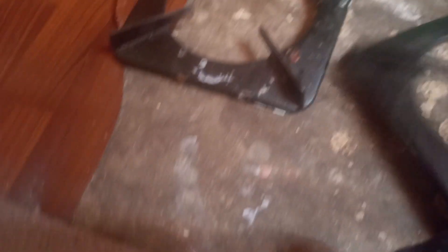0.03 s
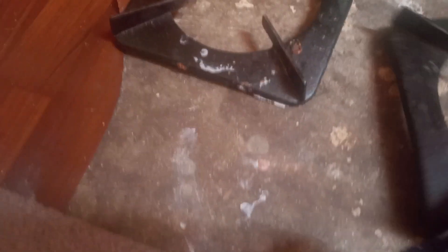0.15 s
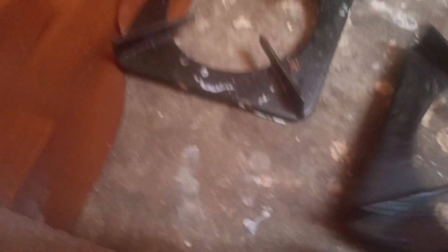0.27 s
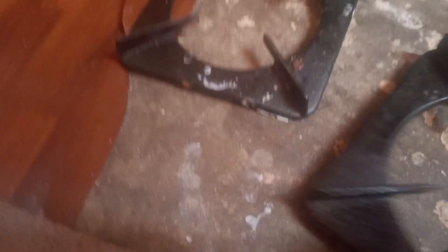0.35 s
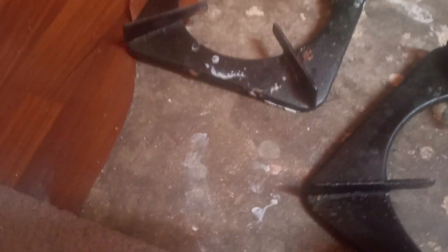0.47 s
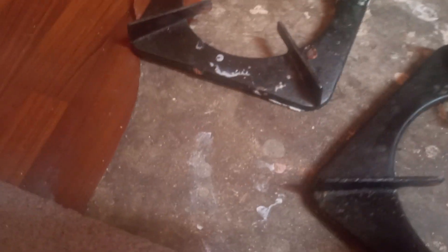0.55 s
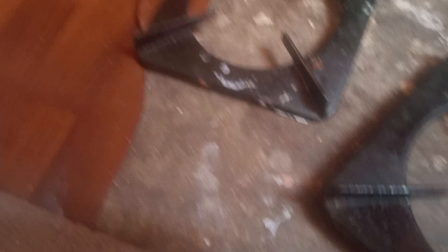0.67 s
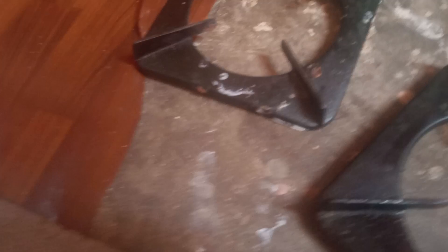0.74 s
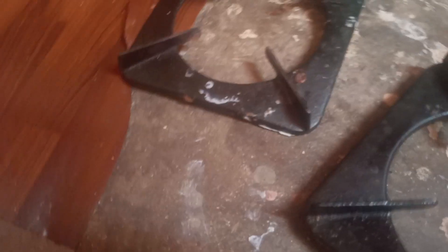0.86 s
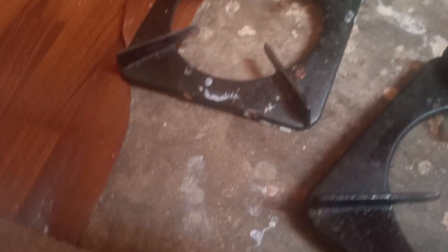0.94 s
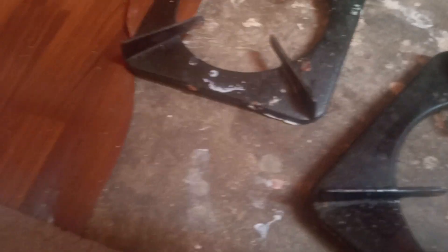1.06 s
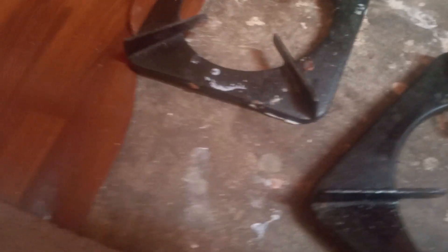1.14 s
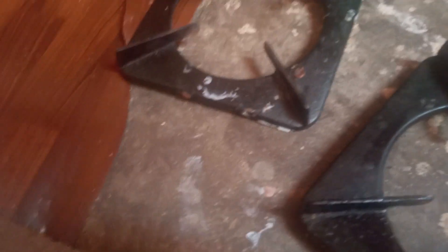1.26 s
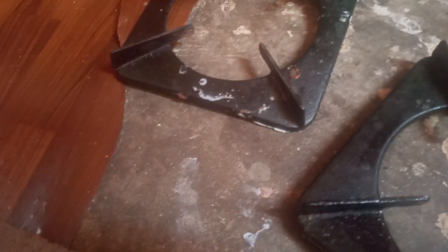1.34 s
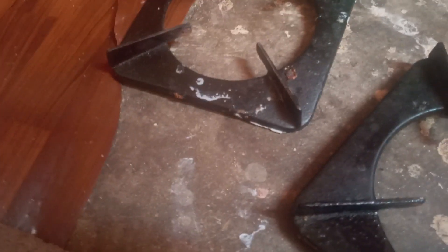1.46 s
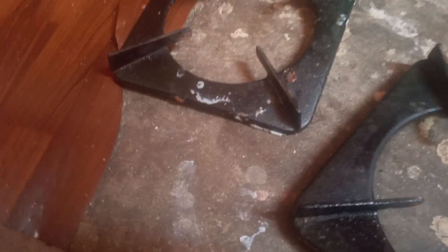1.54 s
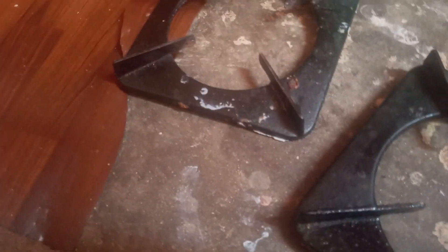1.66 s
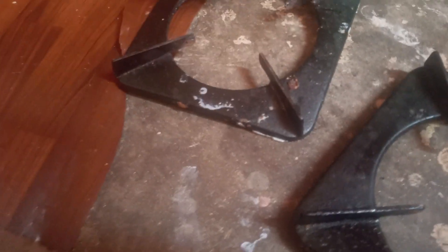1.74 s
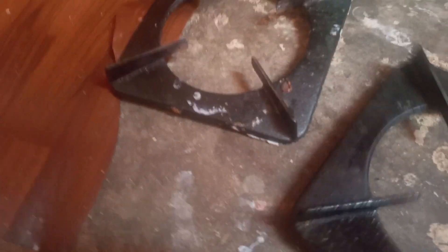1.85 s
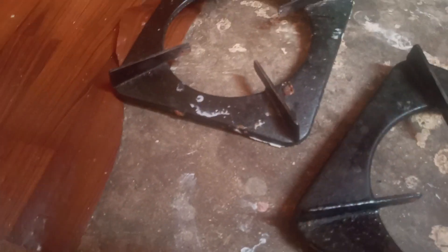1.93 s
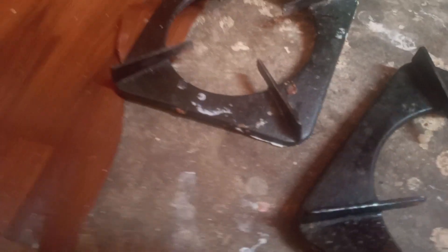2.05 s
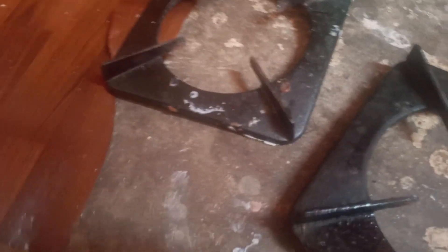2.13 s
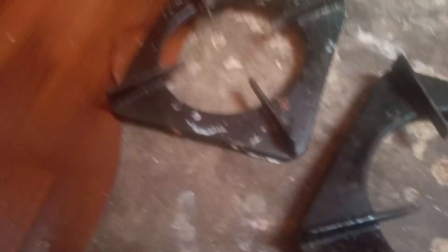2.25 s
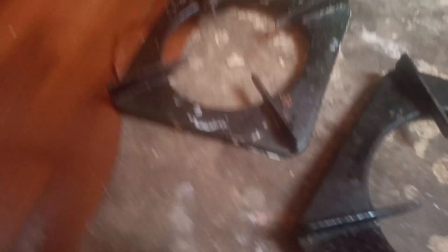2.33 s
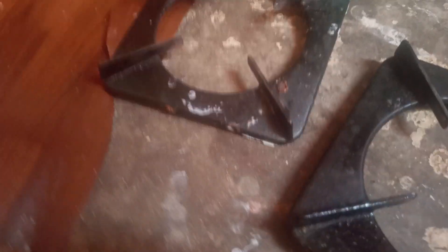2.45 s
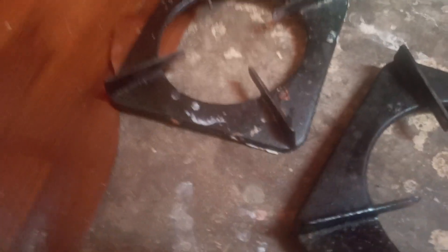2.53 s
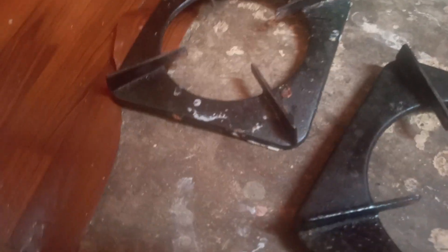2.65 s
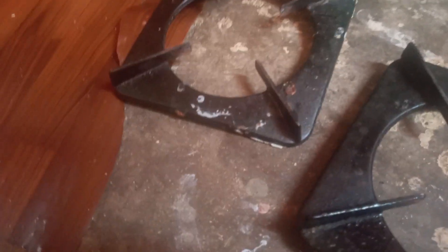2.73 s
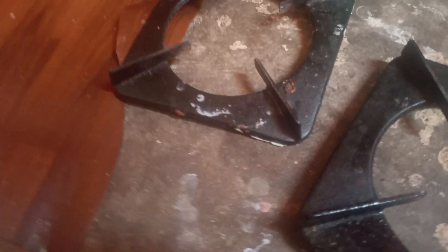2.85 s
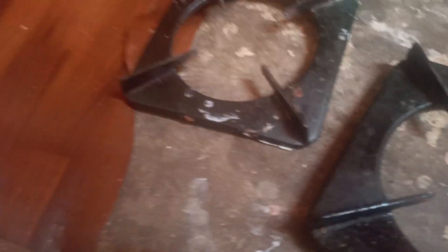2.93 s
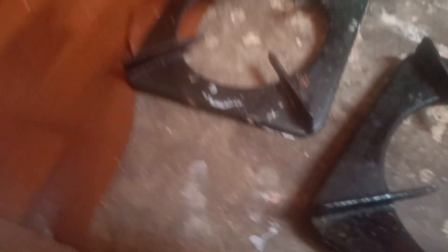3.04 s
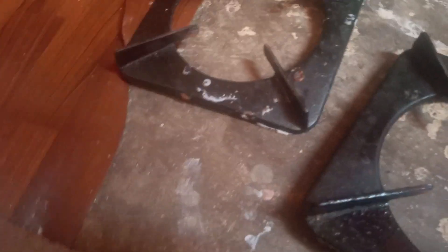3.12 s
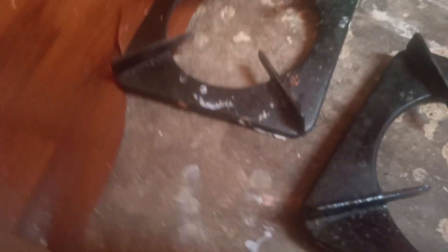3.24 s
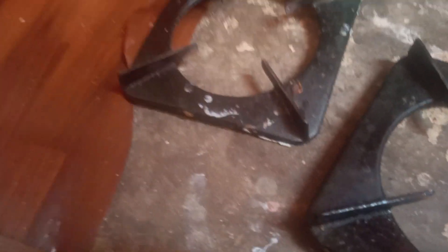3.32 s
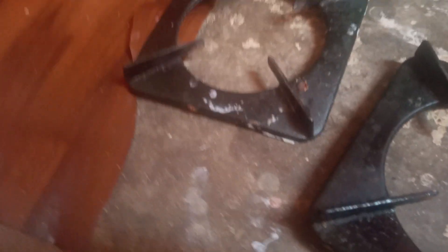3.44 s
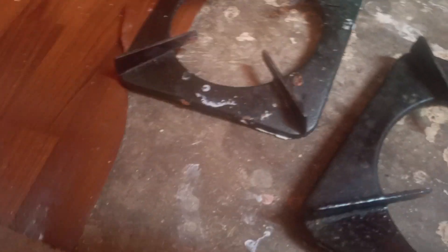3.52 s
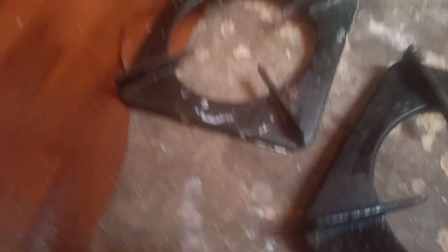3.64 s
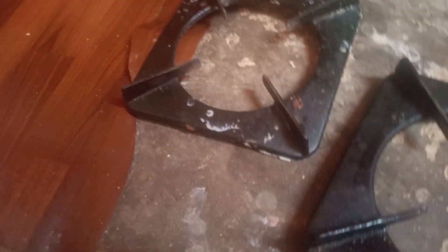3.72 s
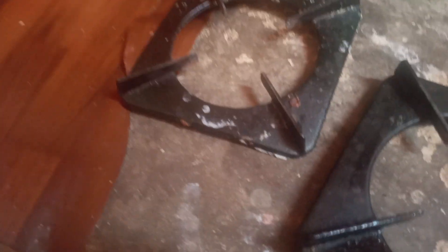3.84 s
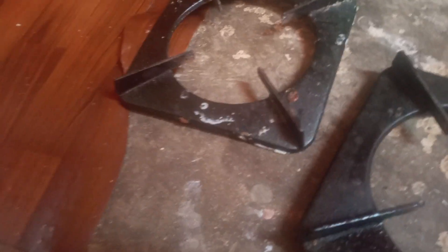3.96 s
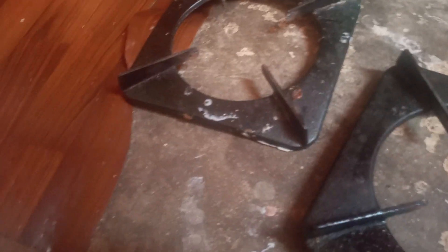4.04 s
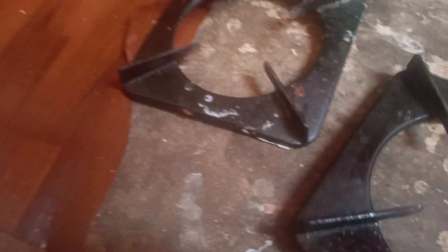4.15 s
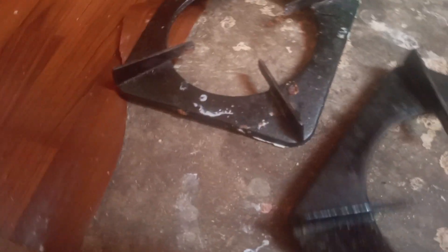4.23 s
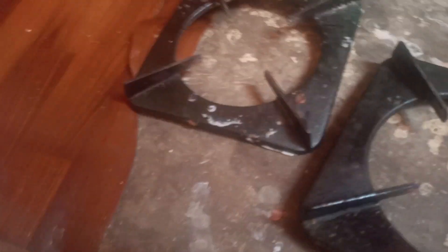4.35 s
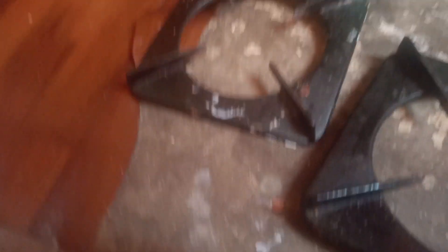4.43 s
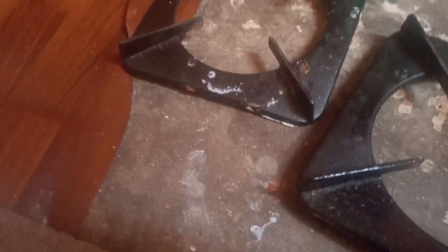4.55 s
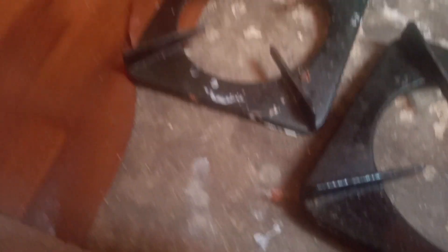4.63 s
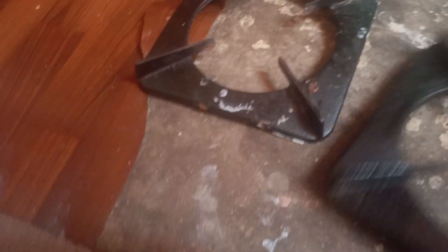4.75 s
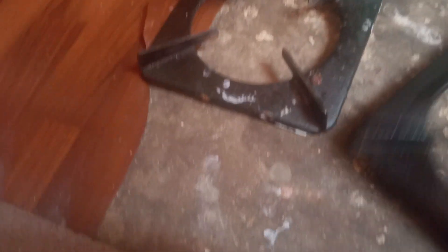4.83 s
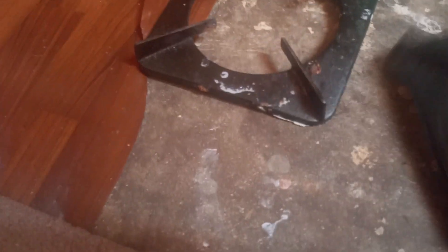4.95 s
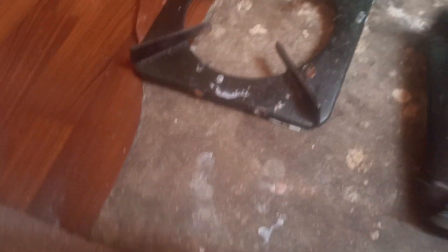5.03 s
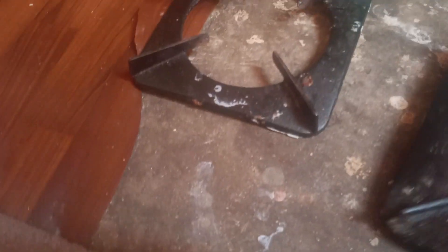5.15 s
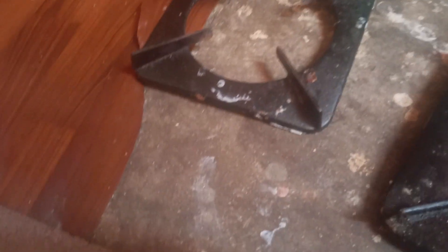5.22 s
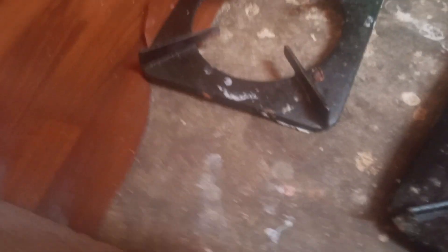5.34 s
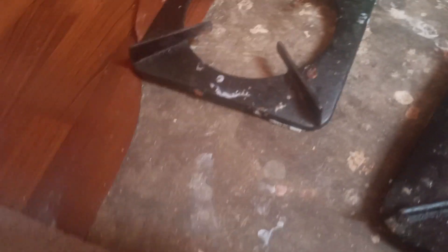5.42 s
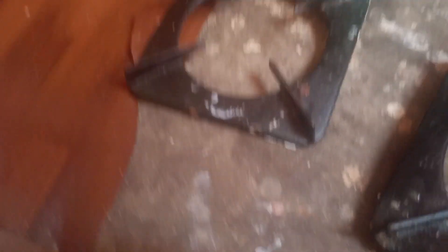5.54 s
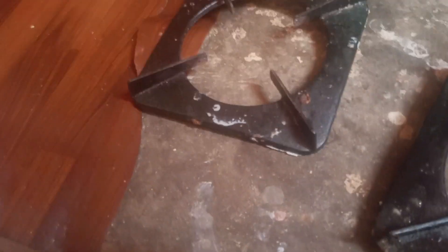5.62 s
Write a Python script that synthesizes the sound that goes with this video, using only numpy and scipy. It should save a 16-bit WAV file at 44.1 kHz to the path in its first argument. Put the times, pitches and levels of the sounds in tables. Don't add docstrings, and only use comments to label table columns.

```python
import sys
import numpy as np
from scipy import signal
from scipy.fft import rfft, irfft
from scipy.io import wavfile

SR = 44100
rng = np.random.default_rng(int(sys.argv[2]) if len(sys.argv) > 2 else 0)


def file_out(sig):
    cols = np.atleast_2d(sig).T
    lim = np.clip(cols, -1, 1)
    pcm = np.round(lim * 32767).astype(np.int16)
    wavfile.write(sys.argv[1], SR, pcm)


def natural_amplitude(level_db):
    exponent = np.asarray(level_db, float) / 20
    return 10 ** exponent


N = 250488
STRONGEST_MODE_HZ = 2444


def rms_one(x):
    return x / np.sqrt(np.mean(x ** 2) + 1e-20)


def in_time(rows, quiet=-120):
    s, *columns = np.transpose(rows)
    t = np.arange(N) / SR
    return [np.interp(t, s, column, quiet, quiet) for column in columns]


def convolve(x, response):
    return signal.fftconvolve(x, response)[:N]


def colour(x, points, size=4096):
    hz, db = np.transpose(points)
    bins_hz = np.arange(size // 2 + 1) * SR / size
    log_gain = np.log(natural_amplitude(np.interp(np.log(bins_hz + 1), np.log(hz), db)))
    cepstrum = irfft(log_gain)
    cepstrum[1:size // 2] *= 2
    cepstrum[size // 2 + 1:] = 0
    return convolve(x, irfft(np.exp(rfft(cepstrum))))


def drift(rate_hz):
    r = np.exp(-2 * np.pi * rate_hz / SR)
    slow = signal.lfilter([1], [1, -2 * r, r * r], rng.standard_normal(N + SR))
    return rms_one(slow[SR:])


def modes(x, table, wander_db, rate_hz):
    out = np.zeros(N)
    for k, (hz, width_hz, db) in enumerate(sorted(table)):
        r = np.exp(-np.pi * width_hz / SR)
        spread_db = wander_db * (hz / 2400) ** 0.32 * min(1, 200 / width_hz)
        fed = x * natural_amplitude(db + spread_db * drift(rate_hz)) + 1e-18
        zeros = [(1 - r * r) / 2, 0, (r * r - 1) / 2]
        poles = [1, -2 * r * np.cos(2 * np.pi * hz / SR), r * r]
        out += (-1) ** k * signal.lfilter(zeros, poles, fed)
    return out


def grains(per_s, spread_db):
    sizes = natural_amplitude(spread_db * np.minimum(rng.exponential(1, N), 4)) * rng.choice([-1, 1], N)
    return rms_one(sizes * (rng.random(N) < per_s / SR))


def split(x, low_hz, high_hz):
    low = signal.sosfilt(signal.butter(2, low_hz, fs=SR, output="sos"), x)
    high = signal.sosfilt(signal.butter(2, high_hz, "high", fs=SR, output="sos"), x)
    return low, x - low - high, high


def bursts(table, rise_s, lead_s, rough, swell=0):
    out, t = np.zeros(N + 6000), np.arange(6000) / SR
    phases = rng.uniform(0, 2 * np.pi, len(table))
    for (s, length, db, hz), phase in zip(table, phases):
        growth = 1 - np.exp(-(t / (rise_s + swell * length)) ** 2)
        hold_s = length * (1 + swell / 2) + lead_s + 0.00076
        shape = growth * np.exp(-0.94 * (t / hold_s) ** 3)
        at = max(round((s - lead_s - swell * length / 2) * SR), 0)
        out[at:at + len(t)] += natural_amplitude(db) * shape * np.sin(2 * np.pi * hz * t + phase)
    return out[:N] * (1 + rough * drift(230))


def background():
    # frequency_hz, level_db per Hz
    spectrum = [(25, -38.5), (45, -16), (70, 2.5), (140, -4), (260, -8), (430, -17.5), (600, -14),
                (1100, -17.5), (2400, -23), (4500, -28), (6000, -25), (8200, -32.5), (10800, -27),
                (13500, -32), (15700, -34)]
    # frequency_hz, width_hz, level_db
    hum = [(77.8, 5.3, -1), (134, 6.4, 4), (308, 2.4, -5), (636.4, 7.5, -9)]
    # time_s, level_db
    murmur = [
        (0, -0.5),
        (1.2, 1.5),
        (3.2, -2),
        (4.7, -3),
        (5.3, 2.5),
        (5.7, -1.5),
    ]
    noise = natural_amplitude(-51) * rms_one(colour(rng.standard_normal(N), spectrum))
    noise += natural_amplitude(-27.5) * modes(rng.standard_normal(N), hum, wander_db=-5.5, rate_hz=3.3)
    low, middle, high = split(noise, 330, 4000)
    middle = middle * natural_amplitude(in_time(murmur)[0] + 1.0 * drift(4.2))
    return low * natural_amplitude(-3.5) + middle + high * natural_amplitude(0.79 * drift(4))


def room(x):
    t60_s = 0.2
    t = np.arange(SR // 2) / SR
    tail = rng.standard_normal(len(t)) * natural_amplitude(-60 * t / t60_s) * (t > .006)
    tail = signal.lfilter([1], [1, -.45], tail)
    return convolve(x, tail / np.sqrt(np.sum(tail ** 2)))


def handling():
    # middle_s, length_s, level_db
    moves = [
        (.12, 0.3, -50),
        (1.07, 0.11, -52),
        (1.505, 0.14, -55),
        (4.409, 0.38, -50),
        (4.75, 0.29, -48),
        (5.103, 0.59, -46),
    ]
    t = np.arange(N) / SR
    swell = sum(natural_amplitude(db) * np.cos(np.pi * np.clip((t - s) / length, -.5, .5)) for s, length, db in moves)
    band = signal.butter(3, [65.7, 310], "band", fs=SR, output="sos")
    return swell * natural_amplitude(4.8 * drift(21)) * rms_one(signal.sosfilt(band, rng.standard_normal(N)))


def suds():
    # time_s, pitch_hz, level_db
    whistle = [
        (5.37, 5750, -85),
        (5.42, 5600, -64),
        (5.46, 5300, -59),
        (5.52, 5140, -79),
    ]
    # start_s, peak_db, pitch_hz
    pops = [(.768, -47, 12000), (.826, -50, 8500), (.961, -38, 6000), (4.541, -53, 10000),
            (4.571, -52, 9800), (4.615, -54, 8000), (1.012, -45, 11000)]
    hz, db = in_time(whistle)
    out = np.sin(2 * np.pi * np.cumsum(np.maximum(hz, 0)) / SR) * natural_amplitude(db) * drift(250)
    t = np.arange(400) / SR
    for (s, db, hz), puff in zip(pops, rng.standard_normal((len(pops), 400))):
        band = signal.butter(2, [hz * .82, hz * 1.4], "band", fs=SR, output="sos")
        at = round(s * SR)
        out[at:at + 400] += natural_amplitude(db) * signal.sosfilt(band, puff * np.exp(-t / 0.002))
    return out


def groan():
    # time_s, pitch_hz, level_db
    slide = [
        (0, 299.4, -36),
        (.08, 308, -61),
        (.13, 308, -42),
        (.24, 308, -41),
        (.32, 303, -56),
        (.36, 305, -74),
    ]
    hz, db = in_time(slide)
    return np.sin(2 * np.pi * np.cumsum(np.maximum(hz, 0)) / SR) * natural_amplitude(db + 2.0 * drift(14))


def squeak():
    # start_s, length_s, peak_db, pitch_hz
    tones = [(1.322, .035, -41.5, 863), (1.352, 0.026, -42.5, 904), (1.378, 0.074, -43.5, 825),
             (1.362, 0.062, -45.5, 1228), (1.42, 0.08, -39, 1793), (1.445, 0.057, -43, 1218),
             (1.45, 0.027, -41, 1420), (1.48, 0.072, -39, 1823), (1.495, 0.057, -42.5, 808),
             (1.495, 0.054, -43, 1515), (1.5, 0.039, -44, 1375), (1.475, 0.036, -37, 1936),
             (1.545, .04, -44, 1860), (1.56, 0.037, -42, 1437), (1.57, 0.071, -44, 1208),
             (1.648, 0.031, -37.5, 815), (3.775, 0.048, -45.5, 806)]
    return bursts(tones, rise_s=0.0062, lead_s=0.00399, rough=0.64)


def pad_motion():
    # start_s, length_s, hiss_db, weight_db on the bars, lean (under 1 fastest early)
    strokes = [(0.858, 0.09, -56, 0, 1.04), (0.922, 0.23, -46.5, 0, 0.53), (1.139, 0.2, -35, 0, 0.82),
               (1.34, 0.19, -34.5, 3.5, 0.81), (1.525, 0.14, -29.5, 1.5, 1.03), (1.661, 0.16, -27, 0, 1.39),
               (1.817, 0.17, -25, -0.5, 1.32), (2.001, 0.16, -32, 0, 0.86),
               (2.146, 0.16, -24.5, -2.5, 0.98), (2.313, 0.23, -28.5, -2.5, 0.96),
               (2.503, 0.13, -45.5, 6, 1.2), (2.576, 0.13, -27.5, -2.5, 0.86),
               (2.701, 0.18, -28, -1.5, 1.01), (2.881, 0.2, -31.5, -1.5, 0.96),
               (3.066, 0.18, -30, -1.5, 0.91), (3.231, 0.19, -27, -3.5, 0.85),
               (3.388, 0.18, -26, -1.5, 1.23), (3.574, 0.19, -24, -4.5, 0.83), (3.751, 0.25, -31, 0, 0.63),
               (3.921, 0.16, -28.5, 1.5, 1.6), (4.08, 0.13, -26, -1, 1.16), (4.238, 0.19, -40, 4.5, 0.68)]
    start_s, end_s, turn_db, turn_weight_db = 1.154, 4.39, -53, 5
    t = np.arange(N) / SR
    hiss = natural_amplitude(turn_db) * np.interp(t, [start_s - .05, start_s, end_s, end_s + 0.16], [0, 1, 1, 0])
    weight_db = np.full(N, float(turn_weight_db))
    for s, length, db, bars_db, lean in strokes:
        speed = np.abs(np.sin(np.pi * np.clip((t - s) / length, 0, 1) ** lean))
        hiss += natural_amplitude(db) * speed ** 1.98
        weight_db += (bars_db - turn_weight_db) * np.sqrt(speed)
    return hiss, weight_db


def scouring():
    # frequency_hz, width_hz, level_db
    bars = [(1776, 20, -8.5), (2296, 69, 2.5), (3090.5, 73, 1), (3069, 16.6, 3.5), (3446, 130, -8.5),
            (3895, 50, -0.5), (4690, 130, -1.5), (5420, 89, -27.5), (5710, 46, 4.5), (5800, 45, 1),
            (6300, 120, -9.5), (6770, 53, 0), (6900, 50, -4.5), (7660, 29, -4.5), (8570, 81, -8.5),
            (9090, 61, -5.5), (9650, 144, -8), (9900, 55, -3.5), (10790, 950, -6.5)]
    # frequency_hz, level_db per Hz
    pad = [(350, -64.5), (600, -50.5), (845, -16), (1010, -22), (1790, -6), (2060, -13), (2290, 3),
           (2670, -2), (3970, -10), (4360, -19.5), (5820, -0.5), (7240, -7.5), (10900, -15.5), (13600, -10),
           (15800, -16)]
    hiss, weight_db = pad_motion()
    stroke = hiss * natural_amplitude(1.0 * drift(10.7))
    pushes = []
    for per_s in (9000, 12000):
        low, middle, high = split(grains(per_s, 4.9) * stroke, 600, 4000)
        pushes.append((low + middle) * natural_amplitude(np.clip(weight_db, -20, 20)) + high)
    ringing = natural_amplitude(10.0) * modes(pushes[0], bars, wander_db=2.5, rate_hz=11.3)
    return ringing + natural_amplitude(5.5) * colour(pushes[1], pad)


def chatter():
    # start_s, length_s, peak_db, pitch_hz
    first = [(0.0, 0.0064, -10.5, 2406), (0.01, 0.017, -17, 2390), (0.0349, 0.033, -16.5, 2432),
             (0.0684, 0.0044, -24, 2360), (0.0771, 0.0084, -31, 2410), (0.0887, 0.019, -20, 2250),
             (0.1105, 0.022, -25, 2390), (0.1299, 0.021, -26.5, 2350), (0.1615, 0.015, -19.5, 2440),
             (0.1746, 0.0065, -27, 2300), (0.1961, 0.034, -10.5, 2432), (0.2246, 0.025, -14.5, 2440),
             (0.2809, 0.0085, -22.5, 2480), (0.2902, 0.015, -15.5, 2410), (0.3112, 0.0057, -12, 2440),
             (0.3175, 0.0068, -10.5, 2440), (0.3341, 0.0073, -12.5, 2410), (0.3473, 0.013, -14.5, 2410),
             (0.3647, 0.0089, -12, 2400), (0.381, 0.0065, -9, 2460), (0.3873, 0.005, -14, 2420),
             (0.4015, 0.012, -10, 2366), (0.422, 0.011, -8.5, 2390), (0.4399, 0.0077, -8.5, 2432),
             (0.4518, 0.017, -17.5, 2403)]
    # start_s, length_s, peak_db, pitch_hz
    later = [(4.327, 0.0088, -17.5, 2330), (4.338, 0.0073, -23, 2370), (4.349, 0.0051, -7, 2394),
             (4.358, 0.0082, -14, 2363), (4.3674, 0.011, -8.5, 2428), (4.384, 0.0074, -12, 2426),
             (4.3904, 0.0108, -14, 2398), (4.405, 0.0082, -18, 2424), (4.7032, 0.0034, -18.5, 2440),
             (4.731, 0.0058, -21, 2470), (4.7386, 0.0046, -18, 2440), (4.801, 0.006, -11.5, 2400),
             (4.814, 0.012, -31, 2360), (4.823, 0.0043, -20, 2400), (4.834, 0.0064, -24, 2400),
             (4.853, 0.0065, -30, 2400), (4.87, 0.014, -18.5, 2400), (4.902, 0.0089, -13, 2400),
             (4.914, 0.0069, -15.0, 2334), (4.924, 0.005, -11, 2346), (4.9288, 0.01, -11, 2340),
             (4.949, 0.0078, -9.5, 2333), (4.9633, 0.022, -12.5, 2397), (4.978, 0.0072, -14, 2290),
             (4.991, 0.0045, -14, 2400), (5, 0.0107, -7.5, 2380), (5.0117, 0.00514, -5.5, 2350),
             (5.022, 0.0112, -9.5, 2340), (5.047, 0.0218, -7.5, 2380), (5.0738, 0.012, -10.1, 2354),
             (5.1004, 0.0087, -24, 2390), (5.108, 0.00875, -17, 2376), (5.1179, 0.0065, -21.5, 2295),
             (5.1244, 0.013, -22, 2300), (5.144, 0.011, -10, 2380), (5.157, 0.0147, -11, 2390),
             (5.1733, 0.0113, -14.5, 2400), (5.1865, 0.013, -11, 2380), (5.204, 0.011, -12.5, 2390),
             (5.214, 0.0108, -21, 2400), (5.2334, 0.0068, -16, 2440), (5.2396, 0.0091, -16, 2377),
             (5.259, 0.02, -23.5, 2404)]
    # start_s, length_s, peak_db, pitch_hz
    struck = [(0.7338, 0.0041, -23, 2310), (0.738, 0.013, -29, 2385), (0.746, 0.01, -26.5, 2420),
              (0.981, 0.0053, -11, 2420), (0.9958, 0.003, -16, 2330), (1.0021, 0.0045, -18.5, 2440),
              (1.015, 0.014, -29, 2390), (1.0667, 0.01, -23.5, 2436), (1.327, 0.0057, -26, 2436),
              (1.337, 0.0052, -33, 2440), (1.6074, 0.0086, -25, 2294), (1.648, 0.011, -26, 2340),
              (1.6636, 0.0051, -28.5, 2440), (1.926, 0.0049, -30.5, 2370), (1.9374, 0.0047, -10.5, 2438),
              (1.9473, 0.0077, -12.5, 2400), (1.956, 0.02, -36, 2440), (1.9745, 0.0053, -26, 2490),
              (1.9832, 0.008, -35, 2470), (2.141, 0.0099, -28, 2454), (2.2132, 0.0077, -33, 2340),
              (2.22, 0.0068, -25.5, 2330), (2.2358, 0.0078, -30, 2440), (2.241, 0.0042, -29, 2400),
              (2.249, 0.0045, -23, 2400), (2.259, 0.0084, -9.5, 2428), (2.277, 0.0043, -25, 2450),
              (2.8605, 0.0034, -34, 2380), (2.869, 0.0071, -35, 2470), (3.723, 0.018, -23, 2400),
              (3.7515, 0.014, -10, 2428), (3.78, 0.019, -30, 2450), (4.182, 0.0049, -26, 2430),
              (4.1955, 0.0075, -8.5, 2340), (4.2019, 0.0044, -9, 2384), (4.211, 0.0061, -11, 2440),
              (4.233, 0.0098, -25, 2450), (4.25, 0.0072, -29, 2470), (5.5715, 0.011, -28.5, 2402)]
    # frequency_hz, width_hz, level_db
    ring = [(2483, 24, -14), (2438, 18, -10), (2402, 22, -10)]
    drawn = [(s, length, db, hz + .4 * (STRONGEST_MODE_HZ - hz)) for s, length, db, hz in later]
    tone = bursts(first + drawn, rise_s=0.00085, lead_s=.0008, rough=0.24, swell=.3)
    tone = tone + bursts(struck, rise_s=0.00098, lead_s=.0008, rough=0.24, swell=.12)
    tone = natural_amplitude(-0.17) * tone
    return tone + modes(tone, ring, wander_db=4.5, rate_hz=8.0)


def feet(drags, knocks):
    grit = grains(7000, 3.84) * natural_amplitude(1.7 * drift(68))
    force = np.zeros(N)
    for table in drags:
        grind_db, bright_db = in_time(table)
        low, middle, high = split(grit * natural_amplitude(grind_db), 1000, 4400)
        force += low + middle + high * natural_amplitude(bright_db)
    slips, t = rng.standard_normal((len(knocks), 2000)), np.arange(2000) / SR
    touch_s = 0.000068
    touch = natural_amplitude(3) * np.exp(-t / touch_s) * t / touch_s
    locked = 0.1 * np.sin(2 * np.pi * STRONGEST_MODE_HZ * t)
    for (s, db, rise, fall, low_db, bright_db), slip in zip(knocks, slips):
        shape = (1 - np.exp(-t / rise)) * np.exp(-t / fall)
        low, middle, high = split((slip * shape + touch) * natural_amplitude(db + 2.5), 1740, 2500)
        middle = middle + locked * shape * natural_amplitude(db - 3.0)
        at = round(s * SR)
        force[at:at + 2000] += low * natural_amplitude(min(low_db, 12)) + middle + high * natural_amplitude(min(bright_db, 14))
    return force


def iron(force, damping_hz):
    # frequency_hz, width_hz, level_db
    body = [(680, 247, -18.5), (1709, 221, -5), (2414, 41, -16), (2880, 30, -24), (3140, 21, -17.5),
            (3210, 33, -24.5), (3906, 65, -19), (4640, 88, -16), (5940, 250, -27), (6470, 57, -22),
            (6684, 59, -20.5), (7030, 110, -16.5), (7036, 690, -23.5), (8040, 190, -44.5),
            (8070, 83, -23.5), (8870, 40, -45.5), (9720, 27, -50), (9770, 110, -31.5), (10060, 95, -22),
            (11060, 180, -24.5), (11470, 28, -34.5)]
    # frequency_hz, width_hz, level_db
    partners = [(2440, 28, -9), (2468, 13, -11.5), (2256, 180, -14.5), (2078, 262, -11), (1424, 360, -17.5),
                (1800, 230, -13.5), (767, 28, -22.5), (592, 37, -24), (586, 30, -45.5), (8920, 1500, -31.5)]
    # frequency_hz, level_db per Hz
    fill = [(150, -1.5), (405, -27.5), (686, -18.5), (1150, -43), (1650, -6.5), (2210, -39.5), (2430, 4.5),
            (2680, -23), (3020, -10), (3960, -21), (4280, -15.5), (6970, -49.5), (11100, -33), (15800, -65)]
    damped = [(hz, width + damping_hz + hz / 500, db) for hz, width, db in body + partners]
    sound = natural_amplitude(12.5) * modes(force, damped, wander_db=2.5, rate_hz=22.0) + natural_amplitude(7.5) * colour(force, fill)
    return signal.sosfilt(signal.butter(4, 470, "high", fs=SR, output="sos"), sound)


def pressed_support():
    # start_s, length_s, grind_db, brightness_db
    skids = [
        (1.318, .002, -23, 1.5),
        (1.641, 0.016, -21, -7),
        (1.934, 0.042, -14.5, -1.5),
        (2.252, 0.0024, -10.5, 0),
        (3.719, 0.013, -15.5, 2),
        (4.194, 0.013, -6.5, -3.5),
    ]
    # start_s, peak_db, fall_s, low_weight_db, brightness_db
    knocks = [(1.329, -13.5, 0.0037, -15, -4), (1.6097, -20.5, 0.0059, -2, 8),
              (1.647, -23.5, 0.0087, 12, -13), (1.9356, -0.5, 0.0046, -1.5, -20),
              (1.947, -2, 0.0048, -4, -11), (1.9704, -9, 0.0026, 5, 11.5), (2.1431, -22.5, 0.0055, 2, -9),
              (2.2593, -14.5, 0.0083, 6, -36), (2.862, -13.5, 0.0073, 3.5, 1),
              (3.725, -16.5, 0.0061, -14, 13), (3.751, -9.5, 0.013, 0, -8), (4.121, -31.5, 0.0041, -7.5, 8),
              (4.1974, -5.5, 0.0092, -12, -18), (4.2111, -12, 0.0031, -15, -12)]
    attack_s, release_s, edge_db = 0.017, 0.06, -33
    grinding = []
    for s, length, db, bright_db in skids:
        grinding.append([(s - attack_s, db + edge_db, bright_db),
                         (s, db, bright_db),
                         (s + length + 0.00059, db, bright_db),
                         (s + length + release_s, db + edge_db, bright_db)])
    timed = [(s, db, 0.0023, *rest) for s, db, *rest in knocks]
    return iron(feet(grinding, timed), damping_hz=110)


def dragged_support():
    # time_s, grind_db, brightness_db
    drags = [
        [(0.0, -12.5, 4.5), (0.072, -12, 3.5), (0.094, -6.5, 3.5), (0.148, -11, 4.5), (0.18, -12, 8),
         (0.23, -17.5, 1), (0.264, -20.5, 4), (0.292, -13.5, 6.5), (0.355, -11, -2), (0.375, -7, 9.5),
         (0.44, -13.5, -1.5), (0.55, -43, -9)],
        [(4.31, -23, -8.5), (4.33, -19.5, -4), (4.356, -8, 4), (4.4, -16, -5), (4.425, -29, 5.5),
         (4.45, -54, -0.5)],
        [(4.69, -57, 22), (4.704, -38, 5), (4.736, -29, 18.5), (4.782, -45.5, 11)],
        [(4.783, -35, 12), (4.802, -16, 8.5), (4.86, -20.5, 5.5), (4.89, -21, -1), (4.905, -14.5, 9.5),
         (4.95, -12, 0.5), (5.075, -12, 5.5), (5.16, -13, -7.5), (5.21, -14.5, 4.5), (5.268, -18.5, -1.5),
         (5.36, -66, 5)],
        [(5.5, -61, 11), (5.554, -53, 17), (5.574, -28.5, -19), (5.592, -38.5, 7), (5.644, -35.5, -4),
         (5.68, -67, 28)],
    ]
    # start_s, peak_db, fall_s, low_weight_db, brightness_db
    knocks = [(0.7306, -17, 0.003, 6.5, -26), (0.7395, -28, 0.012, 14.5, -8), (0.9414, -34, 0.0023, 17, 23),
              (0.98, -3.5, 0.0046, -12, -26), (0.995, -11.5, 0.0028, 6, -25), (1.0049, -32, 0.022, 12, 0),
              (1.064, -22, 0.0064, 6, -24), (4.703, -17, 0.0033, 9.5, 13), (4.714, -25.5, 0.005, -4, 14),
              (4.7324, -19, 0.0031, 11.5, 14), (5.5735, -28.5, 0.0064, 14, -2),
              (5.6138, -35.5, 0.0025, -10, 10)]
    # start_s, peak_db, fall_s, tone_width_db
    slips = [(0.0907, -10, 0.0036, 12), (0.1178, 1, 0.0013, 26), (0.162, -7, 0.0034, 18),
             (0.192, -14.5, 0.028, 15), (0.226, -22.5, 0.008, -6), (0.2907, -10, 0.0043, 9),
             (0.3177, -10, 0.0046, 12), (0.3344, -12, 0.0019, -3.5), (0.349, -8, 0.017, -4),
             (0.382, -4, 0.021, 6), (0.405, -3.5, 0.0055, -3), (0.4234, 1, 0.0052, -13),
             (0.4414, -15, 0.0026, -14), (4.352, -2.5, 0.0045, -13.5), (4.3866, -22, 0.0058, 2),
             (4.8028, -6.5, 0.0038, 11), (4.8723, -7, 0.0033, 13), (4.9046, -15, 0.0072, 1.5),
             (4.934, 1, 0.0029, -4), (4.95, -3, 0.0032, 1), (4.963, -11, 0.0059, -15),
             (5.0018, -22.5, 0.0062, -6), (5.025, -6, 0.0056, -7), (5.051, -3, 0.018, 1.5),
             (5.076, -2.5, 0.003, 11), (5.146, -8.5, 0.0044, 13), (5.158, -16, 0.0056, -2),
             (5.1889, -10, 0.012, -5), (5.2428, -8, 0.0024, 12)]
    impulses = [(s, db, .0007, *rest) for s, db, *rest in knocks]
    for s, db, fall, wide_db in slips:
        impulses.append((s, db - 4.5, 0.00097, fall, wide_db - 8.5, wide_db - 12))
    return iron(feet(drags, impulses), damping_hz=0)


def scene():
    # frequency_hz, level_db
    radiation = [(880, 1), (1120, -10), (1380, 0), (2510, 0), (2620, -7), (2850, 0), (3400, 0), (3620, -4),
                 (3850, 0), (11800, 0), (12400, -8), (15000, -4)]
    support = colour(dragged_support() + pressed_support() + chatter(), radiation)
    close = scouring() + squeak() + groan() + support
    return (close + natural_amplitude(-21) * room(close) + background() + handling() + suds())[None]


def roll_off(x):
    return signal.sosfilt(signal.butter(12, 16990, fs=SR, output="sos"), x)


def record(dry):
    # frequency_hz, level_db
    microphone = [(3900, 0.5), (4450, -12), (5100, -1), (12300, -0.5), (13800, -11), (14800, 1)]
    heard = 0.8 * np.tanh(colour(dry[0], microphone) / 0.87)
    top_cut = signal.ellip(12, .5, 70, 15720, fs=SR, output="sos")
    return roll_off(signal.sosfilt(top_cut, heard)[None])


dry = scene()
out = record(dry)
file_out(out)
```